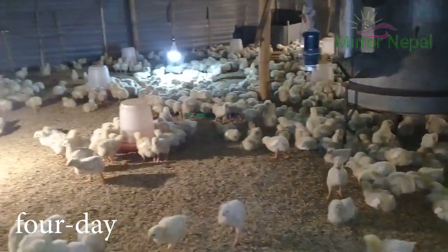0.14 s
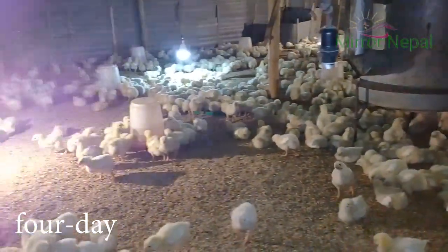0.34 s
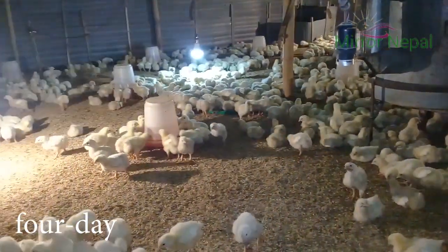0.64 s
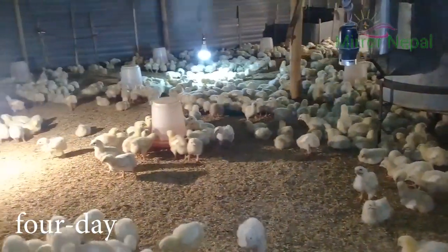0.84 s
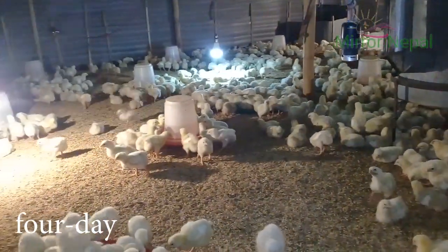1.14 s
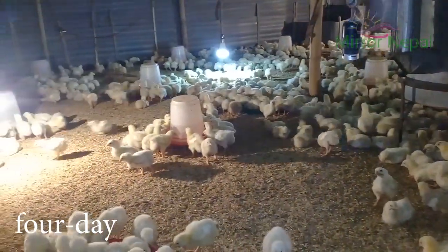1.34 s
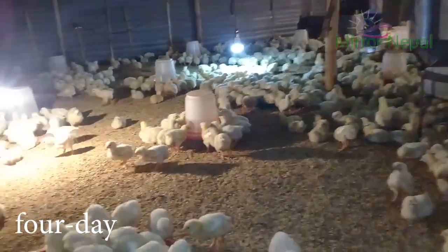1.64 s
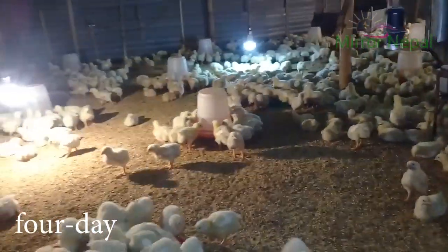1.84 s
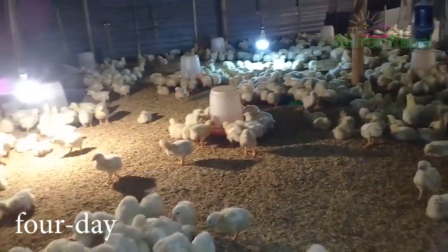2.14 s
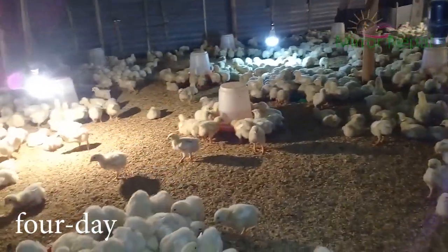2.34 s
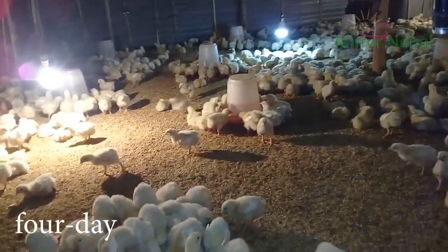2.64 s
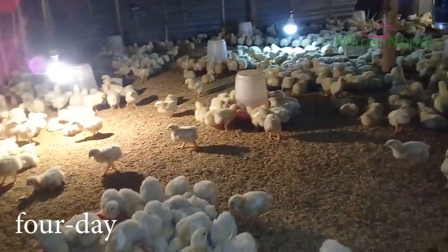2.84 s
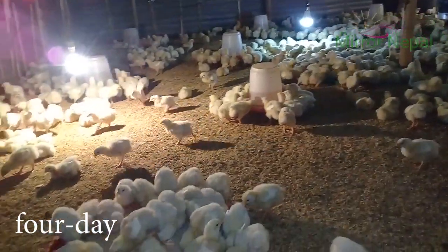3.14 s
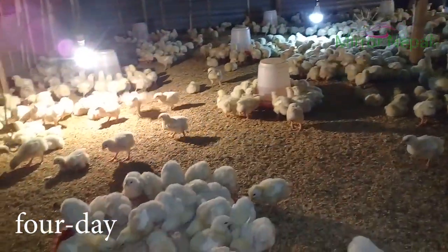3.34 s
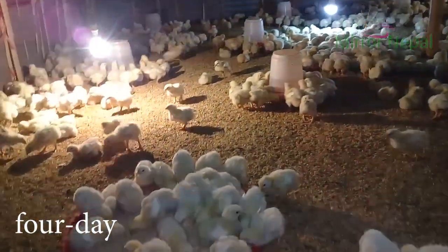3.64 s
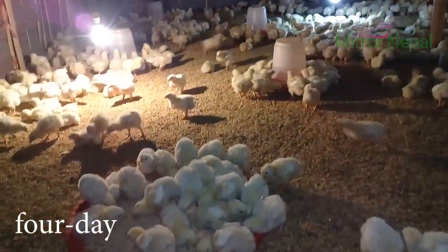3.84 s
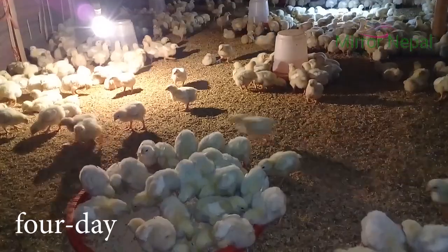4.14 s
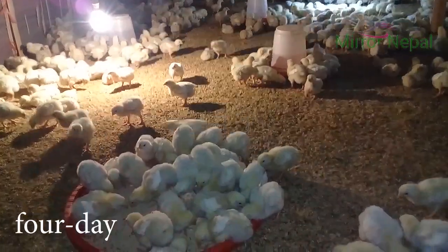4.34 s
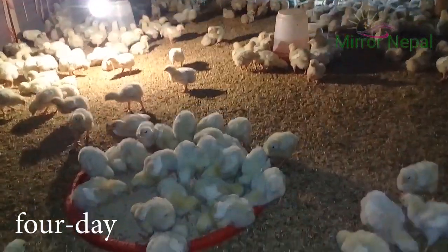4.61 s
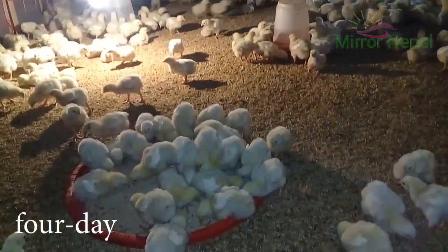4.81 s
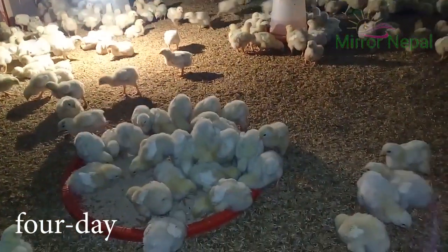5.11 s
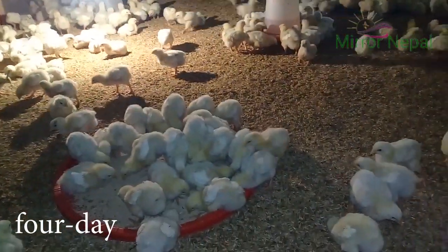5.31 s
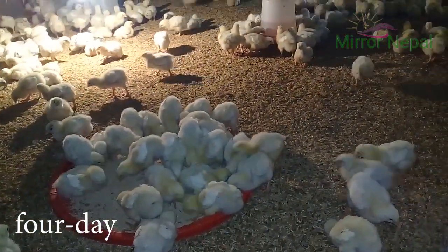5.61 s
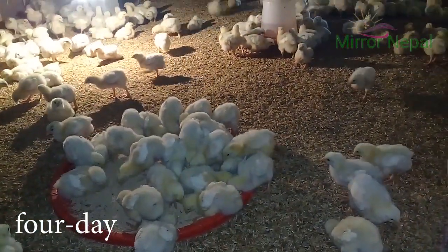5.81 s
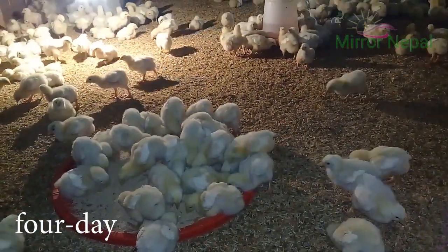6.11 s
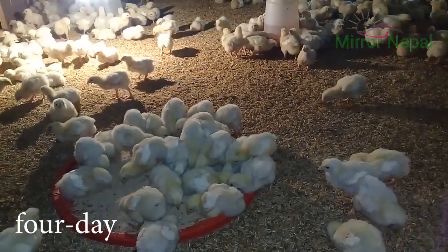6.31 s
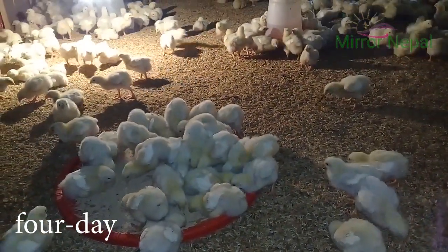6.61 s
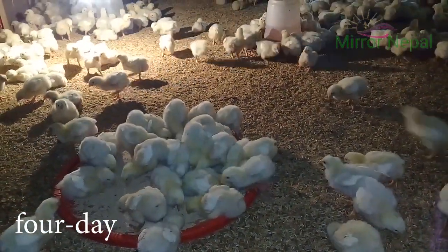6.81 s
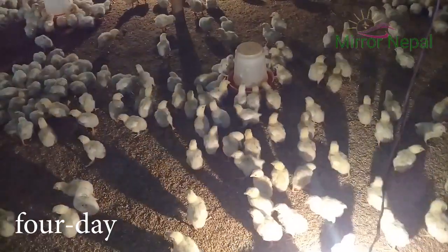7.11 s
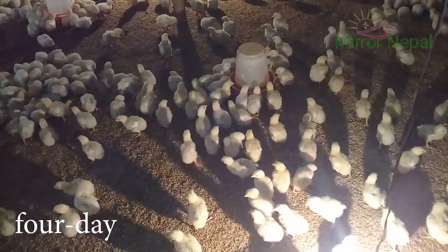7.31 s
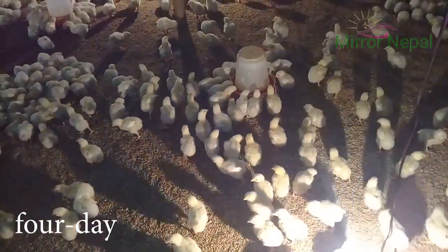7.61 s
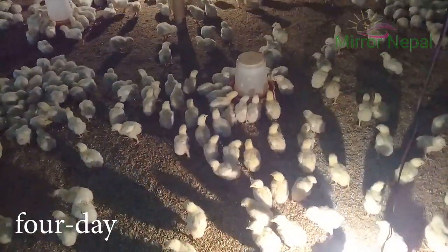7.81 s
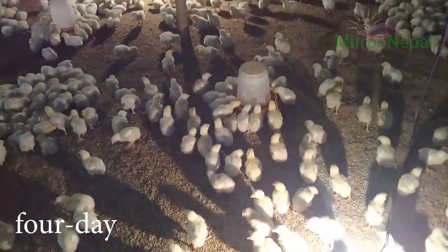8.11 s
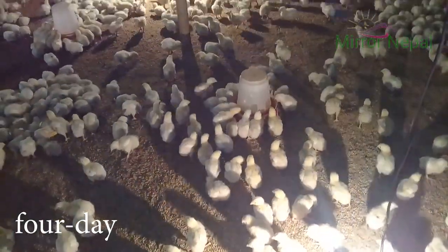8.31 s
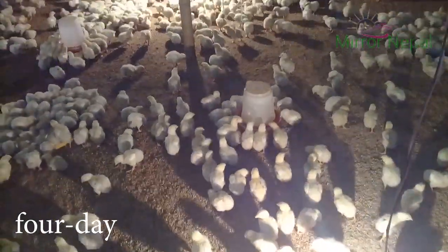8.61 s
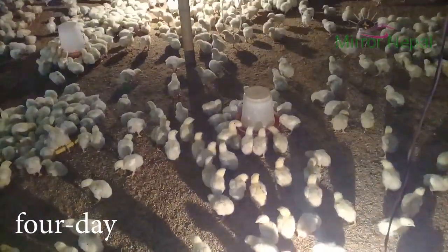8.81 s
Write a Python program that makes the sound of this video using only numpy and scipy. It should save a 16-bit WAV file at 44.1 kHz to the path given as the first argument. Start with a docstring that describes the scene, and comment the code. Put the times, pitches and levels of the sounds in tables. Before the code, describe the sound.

Dense, high chick chatter fills a mildly reverberant poultry shed, individual whistled peeps standing out close by. Litter patter is clearer in the first few seconds, then recedes. Soft bumps and rubs come from handling near the microphone, with firm knocks around four and five seconds. In the last two seconds the low rumble dips and breathy surges of air noise join the flock, briefly hollow and bright-edged.

```python
"""Throughout: hundreds of young chicks peep in a sheet-walled shed, over low rumble, fine hiss and litter patter.
From the start: falling peeps, arched chirps and short trills (gliding whistles) stand out of the chorus
of random cheeps; dull knocks (decaying sines) and scuffs (resonant noise) sound close to the microphone.
To 3.5 s: the litter (noise grains) grows louder, then drops.
From 6.92 s: the rumble drops; an airy rush of filtered noise surges, with a hollow note and a bright edge."""
import sys
import numpy as np
from scipy import signal
from scipy.fft import rfft, irfft, next_fast_len
from scipy.io import wavfile
from scipy.ndimage import uniform_filter1d

SR = 44100
rng = np.random.default_rng(int(sys.argv[2]) if len(sys.argv) > 2 else 0)


def int16_out(signal):
    """Quantize to a 16-bit WAV file."""
    q = np.round(np.clip(np.atleast_2d(signal).T, -1, 1) * 32767)
    wavfile.write(sys.argv[1], SR, q.astype(np.int16))


N = 394694
TIME = np.arange(N) / SR

# Call and knock levels are nominal: before flutter and room.
# Near peeps: accent t/s, length/s, accent f/Hz, downward slide/(octave/s), level/dB
PEEPS = [(.01, 0.041, 2730, 6, -36), (0.18, 0.091, 3105, 1.5, -41.5), (0.217, .07, 2577, 5, -41),
         (0.421, 0.19, 3870, .5, -50), (0.476, .025, 3315, 15.5, -35), (0.588, 0.077, 2650, 7.5, -39),
         (1.004, 0.1, 2600, 6, -37), (1.12, 0.079, 2526, 2, -41), (1.312, 0.094, 2667, 7.5, -37.5),
         (1.438, 0.083, 2840, 5, -37), (1.613, 0.07, 2700, 3.5, -37.5), (1.653, 0.037, 2300, 8.5, -33.5),
         (1.89, 0.044, 2060, 2, -41.5), (2.411, 0.037, 2080, 0, -42.5), (1.946, 0.088, 2710, 5.4, -36),
         (2.178, 0.049, 2475, 8, -33.5), (2.302, 0.067, 2747, 6.5, -32), (2.648, 0.12, 2556, 3, -34.5),
         (3.059, 0.079, 2380, 6.5, -32), (3.142, .021, 2570, -15, -42), (3.43, 0.013, 2580, -12, -34.5),
         (3.534, 0.065, 3450, -0.5, -49), (3.584, 0.085, 2640, 11, -35), (3.845, 0.039, 2950, 3.5, -36),
         (3.89, .045, 2220, 11.5, -29), (4.241, .052, 2437, 8, -30), (4.679, 0.087, 2617, 5.5, -31.5),
         (4.957, 0.093, 2670, 5, -31), (4.971, 0.039, 2560, 10.5, -26.5), (5.248, 0.092, 2530, 9, -30.5),
         (5.675, 0.11, 2610, 3.5, -34.5), (5.898, 0.029, 2760, 10.5, -35.5), (6.932, 0.1, 2405, 6.5, -37.5),
         (6.948, 0.075, 2710, 3.5, -38), (7.108, 0.121, 3480, 2.5, -43), (7.215, 0.029, 2984, 5, -34.5),
         (7.246, 0.094, 2640, 4, -40.5), (7.507, 0.084, 3475, 3, -37.5), (7.513, 0.12, 2656, 4.5, -34),
         (7.582, 0.069, 2457, 5, -38), (7.675, .035, 2880, 9, -40), (7.737, 0.088, 2165, 2, -42),
         (7.822, .054, 2730, 6.5, -30.5), (7.887, 0.073, 2776, 4, -38), (7.965, 0.14, 3530, 3, -43),
         (8.018, 0.043, 2317, 4, -36.5), (8.092, 0.1, 3174, 0.3, -39.5), (8.165, 0.092, 2620, 4, -31.5),
         (8.463, 0.052, 2587, 4, -28), (8.75, 0.1, 2596, 4.5, -33), (8.906, 0.12, 3390, 3.5, -42.5)]
PEEP_LEAD_SHARE = 0.52  # part of the length before the accent
PEEP_EASING = 0.86  # slide after the accent, as a share of the slide before it
# Near chirps, up then down: top t/s, length/s, top f/Hz, level/dB
CHIRPS = [(1.861, .045, 3030, -42), (2.02, 0.036, 3850, -33), (2.145, 0.053, 3740, -37),
          (2.227, 0.065, 3156, -38.5), (3.232, 0.11, 3760, -41.5), (3.277, 0.042, 2650, -30.5),
          (4.374, .043, 2563, -28.5), (5.214, 0.074, 3285, -47), (5.705, 0.046, 3860, -44.5),
          (6.553, 0.04, 3860, -45.5)]
CHIRP_START_SHARE, CHIRP_END_SHARE = 0.98, 0.87  # of the top pitch
# Near trills: start t/s, length/s, centre f/Hz, arches/(1/s), level/dB, octave overtone/dB
TRILLS = [(.344, .16, 3450, 28.3, -43, -50), (2.195, .18, 3914, 28, -53, -33),
          (2.243, 0.13, 2807, 33, -33.5, -43), (2.519, 0.12, 2740, 34, -33.5, -47),
          (4.629, 0.16, 3260, 23, -49, -33), (7.786, 0.15, 2847, 31.5, -42.5, -20),
          (8.442, .14, 2800, 28.3, -37.5, -29.5)]
TRILL_SWING = 0.067  # +/- share of the pitch
# Whole flock, before trim: t/s, level/dB
CHORUS = [(0.0, -39.5), (0.42, -39), (0.89, -42), (1.25, -39), (1.69, -40), (2.14, -37), (2.89, -42),
          (3.21, -38.5), (3.34, -42), (4.19, -43), (4.59, -39), (5.58, -43), (6.83, -42), (7.08, -39.5),
          (7.43, -41), (7.98, -36), (8.5, -42), (8.95, -42)]
# Flock spectrum, small throats and beaks: f/Hz, level/dB
CHEEP_SPECTRUM = [(1700, 3.5), (2000, -9), (2250, -3), (2600, 2.5), (3100, -3.5),
                  (3700, -5.5), (4100, 3), (5000, 3), (9000, -20.5)]
# Knocks: t/s, ring f/Hz, level/dB
KNOCKS = [(1.2217, 398, -27), (1.615, 84.5, -43), (1.653, 140, -39), (1.801, 112, -36), (1.818, 102, -32.5),
          (2.344, 86, -39), (2.825, 225, -34.5), (2.9357, 220, -31), (3.965, 116, -24.5),
          (4.619, 80.6, -41), (4.958, 76, -52), (5.227, 322, -14.5), (5.259, 95, -34.5), (5.352, 78, -39.5),
          (5.433, 96, -40), (6.5981, 267, -30), (6.606, 78.5, -41), (6.754, 64.6, -48)]
KNOCK_CYCLES = 0.52  # decay to 1/e
# Scuffs: middle t/s, half the faded span/s, centre f/Hz, single-pass bandwidth/Hz, level before halving/dB
SCUFFS = [(0.503, .11, 690, 450, -47), (0.775, .17, 570, 606, -55), (1.44, 0.27, 720, 392, -54),
          (1.647, 0.17, 413, 730, -50), (2.357, 0.089, 1560, 2480, -47), (2.373, .18, 151, 300, -52.5),
          (3.931, .02, 324, 69.6, -20), (3.935, 0.091, 374, 76, -28), (3.956, 0.078, 800, 1100, -38.5),
          (5.765, 0.17, 393, 800, -56.5), (6.401, .26, 283, 624, -50), (7.158, 0.2, 368, 240, -52.5),
          (7.16, 0.069, 578, 60, -46), (8.187, 0.12, 414, 220, -45), (8.189, .05, 622, 69.5, -41),
          (8.267, 0.13, 1130, 110, -49), (8.638, 0.066, 1085, 250, -49.5), (8.921, 0.15, 374, 433, -53)]
RUSH_START_S = 6.92
# Surges of the rush, before trim: peak t/s, level/dB
SURGES = [(6.92, -46), (7.13, -47), (8, -50.5), (8.18, -45), (8.33, -49)]
SURGE_ATTACK_S, SURGE_FADE_DB_PER_S = 0.16, 26.5
# Rush body spectrum: f/Hz, level/dB
RUSH = [(200, -33), (330, -5.5), (480, -5), (570, -2), (680, -3.5), (820, -6.5), (960, -4), (1100, -3.5),
        (1350, -7), (1900, -6)]
# Hollow note: t/s, gain/dB
HOOT_GAIN = [(7.08, -4), (7.14, 12.5), (7.4, 0.5), (7.95, -5), (8.1, -20)]
# Bright edge spectrum: f/Hz, level/dB
BRIGHT_SPECTRUM = [(1500, 19), (5500, 0.5), (8000, -5.5), (15500, 2)]
# Bright edge: t/s, gain/dB
BRIGHT_GAIN = [(6.92, 12), (7.45, 0), (8.2, 4.5), (8.95, 0)]
# Litter spectrum: f/Hz, level/dB
LITTER_SPECTRUM = [(120, 8.5), (350, -1.5), (750, -3.5), (1300, -7), (4500, -19.5), (7000, -38.5), (13000, -29)]
# Litter: t/s, gain/dB
LITTER_GAIN = [(0, -8), (0.6, 0.5), (3.5, 2), (4.2, -6)]
# Rumble spectrum: f/Hz, level/dB
RUMBLE = [(25, -24), (60, -4), (100, -6.5), (200, -13.5), (400, -13), (750, -16), (1200, -23.5),
          (1600, -11.5), (2000, -23), (3000, -59)]
# Hiss spectrum: f/Hz, level/dB
HISS = [(1500, -8), (3000, 18), (5200, -9.5), (6600, -9), (9000, -4), (11500, -0.5), (15500, -9.5)]


def near_chicks(second_db=-38, third_db=-48):
    """Single birds close by: sliding peeps, arched chirps, and trills whose pitch hops in little arches."""
    out = np.zeros(N)
    for accent_s, length_s, hz, slide, db in PEEPS:
        rise_s = length_s * PEEP_LEAD_SHARE
        fall_s = length_s - rise_s
        start_hz = hz * 2 ** (slide * rise_s)
        end_hz = hz / 2 ** (PEEP_EASING * slide * fall_s)
        pitch, swell = peep(rise_s, fall_s, start_hz, hz, end_hz)
        add(out, accent_s - rise_s, undb(db) * syrinx(pitch, swell, second_db, third_db, jitter=0.0116))

    for top_s, length_s, hz, db in CHIRPS:
        half_s = length_s / 2
        pitch, swell = peep(half_s, half_s, hz * CHIRP_START_SHARE, hz, hz * CHIRP_END_SHARE)
        call = syrinx(pitch, swell, second_db=-35.5, third_db=-34.5, jitter=0.014)
        add(out, top_s - half_s, undb(db) * call)

    for start_s, length_s, hz, rate, db, octave_db in TRILLS:
        u = np.linspace(0, 1, int(length_s * SR))
        arch = np.abs(np.sin(np.pi * rate * length_s * u))
        swell = (0.5 + arch) * np.sqrt(np.abs(np.sin(np.pi * u)))
        pitch = hz * (1 + TRILL_SWING * (2 * arch - 1))
        add(out, start_s, undb(db) * syrinx(pitch, swell, octave_db, third_db))
    return shed(out, wet_db=-10, wall_db=-12)


def peep(rise_s, fall_s, start_hz, peak_hz, end_hz, soft=0.54, accent_width=0.38):
    """Pitch and swell of one call: a soft lead-in, a sudden accent, a falling-off tail."""
    t = np.arange(-int(rise_s * SR), int(fall_s * SR)) / SR
    bend = np.interp(t, [-rise_s, 0, fall_s], [start_hz, peak_hz, end_hz])
    hz = uniform_filter1d(bend, size=900, mode="nearest")
    away = np.minimum(np.abs(np.where(t < 0, t / rise_s, t / fall_s)), 1)
    edge = np.where(t < 0, 14, 5)  # steeper before the accent
    accent = soft + (1 - soft) / (1 + (away / accent_width) ** edge)
    return hz, accent * np.sqrt(np.clip(4 * (1 - away), 0, 1))


def syrinx(hz, swell, second_db, third_db, jitter=0.01403, shimmer_db=4.0, flicker_db=4):
    """A nearly pure whistle with a quaver; two overtones flare up when it is pressed hardest."""
    t = np.arange(len(hz)) / SR
    quaver = jitter * walk(t, 450) + jitter * walk(t, 90)
    phase = 2 * np.pi * np.cumsum(hz * (1 + quaver)) / SR
    overtones = undb(second_db) * np.sin(2 * phase) + undb(third_db) * np.sin(3 * phase)
    tone = np.sin(phase) + overtones * swell * undb(flicker_db * walk(t, 120))
    return np.sqrt(2) * swell * undb(shimmer_db * walk(t, 220)) * tone


def flock(trim_db=0.5):
    """Single cheeps carry from the nearer huddles; the far crowd blurs in the shed."""
    huddles = unit(shed(cheeps(count=560, half_s=0.02, spread_db=3), wet_db=-8))
    crowd = unit(shed(cheeps(count=1700, half_s=0.026, spread_db=2.5), wet_db=5))
    return unit(huddles + crowd) * curve(CHORUS) * undb(trim_db)


def cheeps(count, half_s, spread_db):
    """Many birds at once: short cheeps, mostly falling, each with its own pitch, length and loudness."""
    out = np.zeros(N)
    starts = (np.arange(count) + rng.uniform(-1.5, 1.5, count)) / count * N / SR
    traits = 2.6 * np.tanh(rng.standard_normal((count, 5)) / 2.3)  # near-normal, extremes limited
    for s, (pitch, length, lead, sweep, near) in zip(starts, traits):
        hz = 2720 * np.exp(0.135 * pitch)
        half = half_s * np.exp(0.35 * length)
        glide, swell = peep(half, half, hz * (1.05 + 0.07 * lead), hz, hz * (0.92 + 0.045 * sweep))
        call = syrinx(glide, swell, second_db=-33.5, third_db=-31)
        add(out, s - half, undb(spread_db * near) * call)
    return colour(out, CHEEP_SPECTRUM)


def shed(x, wet_db, t60=0.66, wall_db=-13):
    """Direct sound, three early bounces off floor and walls, and a short diffuse tail; t60 in s."""
    t = np.arange(SR // 2) / SR
    response = rng.standard_normal(len(t)) * undb(-60 * t / t60) * np.minimum(t / 0.0079, 1)
    response *= undb(wet_db) / np.sqrt(np.sum(response ** 2))
    bounces_s = rng.uniform(0.002, 0.018, size=3)
    response[(bounces_s * SR).astype(int)] += undb(wall_db)
    response[0] = 1
    return signal.fftconvolve(x, response / np.sqrt(np.sum(response ** 2)))[:N]


def knocks(tick_db=-9):
    """Dull bumps: sines that die within a cycle or two, each with a brief contact tick of low-passed noise."""
    out, t = np.zeros(N), np.arange(SR // 10) / SR
    lowpass = signal.butter(4, 1700, fs=SR, output="sos")
    for s, hz, db in KNOCKS:
        decay = np.exp(-t * hz / KNOCK_CYCLES)
        body = 2.4 * np.sin(2 * np.pi * hz * t) * decay * (1 - np.exp(-t / 0.00017))
        tick = signal.sosfilt(lowpass, rng.standard_normal(len(t)) * np.exp(-t / 0.0011))
        add(out, s, undb(db) * body)
        add(out, s - 0.001, undb(db + tick_db) * tick / np.abs(tick).max())
    return shed(out, wet_db=-23.5, t60=0.19, wall_db=-20.5)


def scuffs(grip_db=3):
    """Short uneven rubs: noise through one resonance, applied twice."""
    out = np.zeros(N)
    for middle_s, half_s, hz, width_hz, db in SCUFFS:
        t = np.arange(int(2 * half_s * SR)) / SR
        rub = rng.standard_normal(len(t)) * undb(grip_db * walk(t, 121.2))
        rub = resonate(rub, hz, hz / width_hz) * np.hanning(len(t)) ** 2
        add(out, middle_s - half_s, undb(db) * unit(rub) / 2)
    return out


def rush(trim_db=-1, hoot_hz=570, hoot_db=-55, bright_db=-63):
    """An airy rush of coloured noise in surges, with a hollow resonant note that fades and a bright edge."""
    body = colour(rng.standard_normal(N), RUSH) * surges() * undb(trim_db + walk(TIME, 33))
    hoot = unit(resonate(rng.standard_normal(N), hoot_hz, 7))
    hoot *= undb(hoot_db) * curve(HOOT_GAIN)
    bright = colour(rng.standard_normal(N), BRIGHT_SPECTRUM)
    bright *= undb(bright_db) * curve(BRIGHT_GAIN)
    return (body + hoot + bright) * (TIME > RUSH_START_S)


def surges():
    """Each surge swells quickly and fades steadily; their powers add."""
    power = np.zeros(N)
    for s, db in SURGES:
        attack = np.clip(1 + (TIME - s) / SURGE_ATTACK_S, 0, 1)
        fade_db = SURGE_FADE_DB_PER_S * np.maximum(TIME - s, 0)
        power += (attack * undb(db - fade_db)) ** 2
    return np.sqrt(power)


def litter(steps_per_s=34, litter_db=-59):
    """Small feet and beaks patter on dry bedding: random steps, each a decaying noise grain."""
    strength = undb(4 * np.minimum(rng.exponential(size=N), 3))
    steps = (rng.random(N) < steps_per_s / SR) * strength
    t = np.arange(SR // 20) / SR
    grains = signal.fftconvolve(steps, np.exp(-t / 0.02))[:N] * rng.standard_normal(N)
    return colour(grains, LITTER_SPECTRUM) * undb(litter_db) * curve(LITTER_GAIN)


def air(rumble_db=-61, rumble_drop_db=-3, hiss_db=-62.5):
    """Coloured noise: a low wavering rumble, lower once the rush starts, and a fine, nearly even hiss."""
    rumble_level = rumble_db + 2 * walk(TIME, 11.0) + rumble_drop_db * (TIME > RUSH_START_S)
    rumble = colour(rng.standard_normal(N), RUMBLE) * undb(rumble_level)
    hiss = colour(rng.standard_normal(N), HISS) * undb(hiss_db + 0.7 * walk(TIME, 4.8))
    return rumble + hiss


def undb(db):
    """Decibels to gain."""
    return 10 ** (np.asarray(db) / 20)


def unit(x):
    """Scale to rms 1."""
    return x / np.sqrt(np.mean(x ** 2) + 1e-20)


def curve(rows):
    """Gain over time from (t/s, level/dB) rows."""
    return undb(np.interp(TIME, *np.transpose(rows)))


def add(out, s, x):
    """Mix x into out from time s on."""
    i = int(s * SR)
    lo, hi = max(i, 0), min(i + len(x), N)
    if hi > lo:
        out[lo:hi] += x[lo - i:hi - i]


def colour(x, points):
    """Filter by a (f/Hz, level/dB) spectrum with falling skirts; rms 1."""
    hz, db = np.transpose(points)
    size = next_fast_len(len(x))
    f = np.maximum(np.fft.rfftfreq(size, 1 / SR), 1)
    gain = undb(np.interp(np.log(f), np.log(hz), db))
    skirts = np.minimum(f / hz[0], 1) ** 2 * np.minimum(hz[-1] / f, 1) ** 2
    return unit(irfft(rfft(x, size) * gain * skirts, size)[:len(x)])


def resonate(x, hz, q):
    """Two passes through one resonance."""
    b, a = signal.iirpeak(hz, q, fs=SR)
    return signal.lfilter(b, a, signal.lfilter(b, a, x))


def walk(t, rate):
    """Random values joined by lines, rate of them a second."""
    knots = rng.standard_normal(int(t[-1] * rate) + 2)
    return np.interp(t * rate, np.arange(len(knots)), knots)


def scene():
    """All sources at one microphone."""
    chicks = near_chicks() + flock()
    handling = knocks() + scuffs()
    background = rush() + litter() + air()
    return (chicks + handling + background)[None]


def record(dry):
    """The recorder cuts the deepest bass and the top."""
    highpass = signal.butter(2, 48, "highpass", fs=SR, output="sos")
    lowpass = signal.ellip(12, 0.2, 70, 15600, fs=SR, output="sos")
    return signal.sosfilt(lowpass, signal.sosfilt(highpass, dry))


dry = scene()
out = record(dry)
int16_out(out)
```